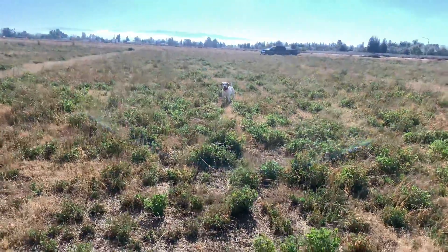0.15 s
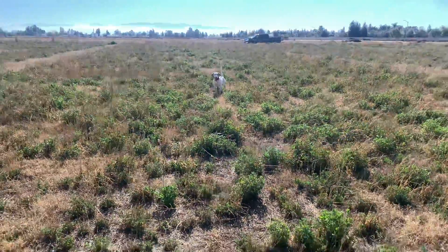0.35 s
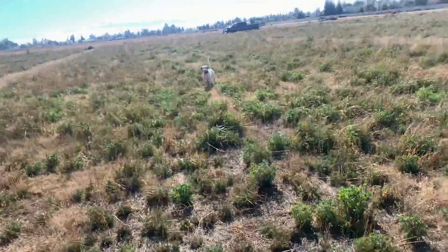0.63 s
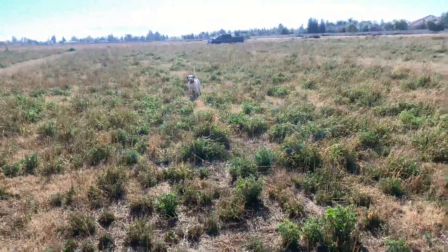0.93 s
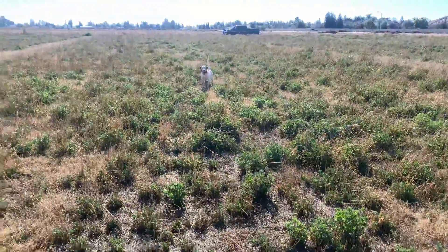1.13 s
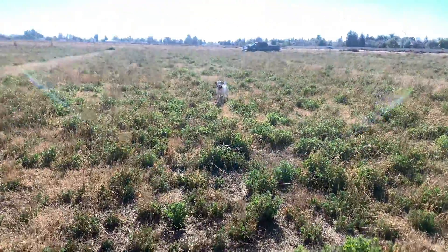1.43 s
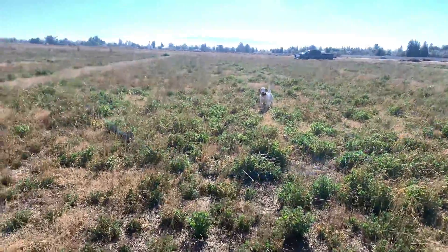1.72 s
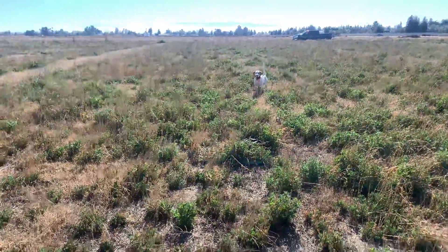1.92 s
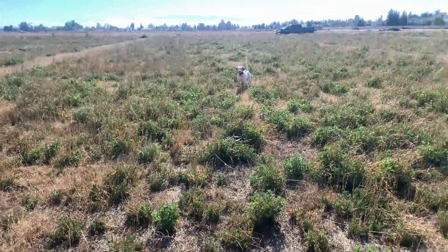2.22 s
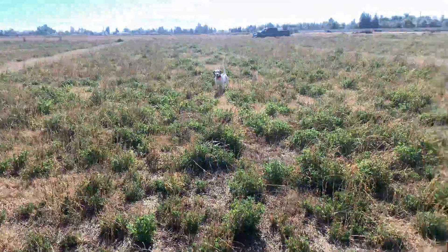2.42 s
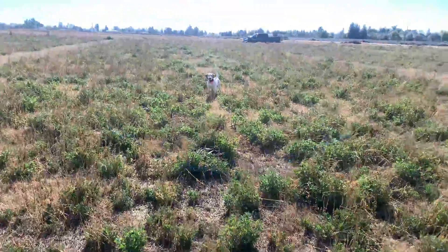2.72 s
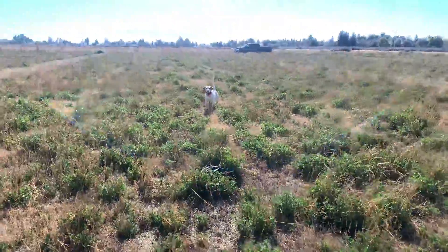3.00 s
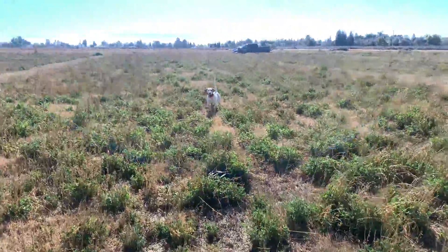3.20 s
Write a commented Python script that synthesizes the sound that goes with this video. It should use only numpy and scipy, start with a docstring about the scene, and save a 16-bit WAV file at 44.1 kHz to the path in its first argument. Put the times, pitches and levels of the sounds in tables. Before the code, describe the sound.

Crunchy footfalls on dry weeds, with snapping stems, leg swishes and faint low wind outdoors

```python
"""Footfalls crunch through dry grass and weeds in an open field, and legs brush the blades between them.
Each contact layers fizzing blades, crackling stalks and grinding earth, all made of tiny random clicks.
Stems snap as noise bursts, twigs click as brief rings, tufts crunch as grains in a sinking resonance,
and dull knocks fall in pitch. Filtered noise makes the wind rumble on two microphone ports and the field hush."""
import sys
import numpy as np
from scipy import signal
from scipy.fft import rfft, irfft, next_fast_len
from scipy.io import wavfile
from scipy.ndimage import uniform_filter1d, map_coordinates

SR = 44100
rng = np.random.default_rng(int(sys.argv[2]) if len(sys.argv) > 2 else 0)


def to_wav(sig):
    """Store sig (one row per channel, or 1-D mono) as 16-bit WAV at the path in sys.argv[1].

    Samples outside -1..1 are clipped; the rate is SR.
    """
    pcm = np.clip(np.atleast_2d(sig), -1, 1) * 32767
    pcm = np.round(pcm).astype(np.int16)
    wavfile.write(sys.argv[1], SR, pcm.T)  # frames by channels


N = 147735  # length in samples

# Bright colour of grass blades and snapping stems. Each row: frequency in Hz, relative density in dB per Hz.
BLADE_COLOUR = [(500, -54), (2000, -17), (4000, -3), (5400, -11.5), (7000, -1), (8800, -1), (11500, -3.5),
                (15800, -5)]


def amp(db):
    """Decibels to gain."""
    return 10 ** (np.asarray(db) / 20)


def unit(x):
    """Scales to rms 1."""
    return x / np.sqrt(np.mean(x ** 2) + 1e-20)


def read(points, hz):
    """Reads a table on a log-frequency axis."""
    f, value = np.transpose(points)
    return np.interp(np.log(hz + 1), np.log(f + 1), value)


def add(mix, s, sound):
    """Adds a stereo sound at time s, trimmed to fit the mix."""
    at = round(s * SR)
    sound = sound[:, max(-at, 0):]
    part = mix[:, max(at, 0):][:, :sound.shape[1]]
    part += sound[:, :part.shape[1]]


def ports(pair, spectrum=None, side=0):
    """Colours a sound and gives it to both ports; the second row is the part that they do not share."""
    # Level between the ports. Each row: frequency in Hz, left minus right in dB.
    port_balance = [(250, 1), (700, -3.5), (1500, 1), (3200, 4.5), (4600, 0), (6100, -6), (7400, 0),
                    (16000, -0.5)]
    # Phase between the ports. Each row: frequency in Hz, lead of the left in radians.
    port_phase = [(1300, .5), (3300, 0.4), (5000, 1.34), (6700, -1.76), (8700, -3), (10600, -6.5),
                  (11500, -7), (13500, -9.5), (15800, -12)]
    # Likeness of the ports. Each row: frequency in Hz, likeness from 0 to 1.
    port_likeness = [(300, 1), (2200, 0.63), (3400, 0.37), (7300, 1), (8600, 1), (11000, 0.56),
                     (13500, .98), (15700, 0.68)]
    mono_hz = 302  # well below this both ports hear the same
    side_from_hz, side_turn_hz = 650, 8340  # side +1 or -1 shifts the phase by one turn between these

    n = next_fast_len(pair.shape[1])
    hz = np.fft.rfftfreq(n, 1 / SR)
    a, b = rfft(pair, n)
    wide = hz ** 2 / (hz ** 2 + mono_hz ** 2)
    like = 1 - wide * (1 - np.clip(read(port_likeness, hz), 0, 1))
    shared = a * np.sqrt((1 + like) / 2)
    apart = b * np.sqrt((1 - like) / 2)

    side_turns = side * np.clip((hz - side_from_hz) / (side_turn_hz - side_from_hz), 0, 1)
    lead = wide * read(port_phase, hz) - 2 * np.pi * side_turns
    tilt = amp(wide * read(port_balance, hz))
    left = (shared + apart) * tilt
    right = (shared - apart) * np.exp(-1j * lead)
    both = np.array([left, right]) * np.sqrt(2 / (1 + tilt ** 2))  # the tilt keeps the total power
    if spectrum is not None:
        both = both * amp(read(spectrum, hz))
    return irfft(both, n)[:, :pair.shape[1]]


def point(sound, spectrum=None):
    """One short sound at the ports, with peak 1."""
    heard = ports(np.array([sound, np.zeros_like(sound)]), spectrum)
    return heard / abs(heard).max()


def clumps(n, length):
    """Slow chance that wanders over about the given time in seconds, with rms 1."""
    slow = np.cumsum(rng.standard_normal(n))
    centred = slow - uniform_filter1d(slow, int(2 * length * SR))
    return unit(uniform_filter1d(centred, int(length * SR / 4)))


def air():
    """Wind that rises and falls by a level table, rumbling on the ports, over the noise hush of the field."""
    # Wind on the ports. Each row: time in seconds, level in dB before trim.
    wind = [(0.0, -37.5), (0.3, -37), (0.44, -37.5), (0.492, -29), (0.562, -42), (1.5, -50), (1.73, -46),
            (1.862, -43), (2.63, -48.5), (2.67, -39.5), (3.01, -50), (3.09, -35), (3.14, -47)]
    # Colours of wind and field. Each row: frequency in Hz, relative density in dB per Hz.
    rumble_colour = [(15, -36), (30, -13), (48, -0.5), (68, 4), (140, -7), (320, -26.5), (600, -38),
                     (2000, -97)]
    field_colour = [(100, -31), (400, 0), (900, -1.5), (1800, 2.5), (2800, -6.5), (16000, -15.5)]
    wind_trim_db, field_db = -1.5, -64.5
    waver_s, waver_db = 0.049, -0.07  # a very slight random waver

    wind_db = wind_trim_db + np.interp(np.arange(N) / SR, *np.transpose(wind))
    level = amp(wind_db + waver_db * clumps(N, waver_s))
    rumble = level * unit(ports(rng.standard_normal((2, N)), rumble_colour))
    hush = amp(field_db) * unit(ports(rng.standard_normal((2, N)), field_colour))
    return rumble + hush


def knock(s, db, hz, halve, swell):
    """A soft, ragged pop whose pitch drops as it swells and dies."""
    rough, bumps_per_cycle = 0.69, 2.72  # irregular share and its detail
    t = np.arange(SR // 6) / SR
    turns = hz * halve * np.log(1 + t / halve)  # cycles so far; the pitch is half at t = halve
    ragged = map_coordinates(rng.standard_normal(size=256), [bumps_per_cycle * turns], mode="mirror")
    x = t / swell
    level = x / (1 + x ** 2) * np.exp(-(x / 2.0) ** 2)
    return s, amp(db) * point((np.sin(2 * np.pi * turns) + rough * ragged) * level)


def tuft(s, length, db, hz):
    """A bunch of stalks gives way: coarse grains ring in a broad resonance that sinks as it flattens."""
    width, sag = 0.52, 0.57  # damping and pitch drop as shares of the first pitch
    grains_per_s = 5000
    t = np.arange(int(2 * length * SR)) / SR
    u = np.minimum(t / length, 1)
    struck = rng.random((2, len(t))) < grains_per_s / SR
    grains = rng.standard_normal((2, len(t))) * struck

    # shift the sinking pitch down to zero, resonate there, and shift back up
    turn = np.exp(2j * np.pi * np.cumsum(hz * (1 - sag * u)) / SR)
    r = np.exp(-2 * np.pi * width * hz / SR)
    ring = (turn * signal.lfilter([1], [1, -2 * r, r * r], grains / turn)).real
    swell = np.sqrt(abs(np.sin(np.pi * np.sqrt(u))))
    return s, amp(db) * unit(ports(ring * swell)) / np.sqrt(2)  # half of the span is silent


def twig(s, db, hz):
    """A woody click: a brief noise crack and a ring that dies within a few cycles."""
    # Colour of the crack. Each row: frequency in Hz, relative density in dB per Hz.
    crack_colour = [(300, -16), (2800, 0), (4300, 2), (5500, -8)]
    crack_s, crack_share, crack_hz = 0.001, 0.25, 2040  # decay; share of the ring's peak at this pitch
    rough, decay_cycles = 0.18, 0.75

    t = np.arange(-256, 1792) / SR
    turns = np.maximum(t, 0) * hz
    tone = np.sin(2 * np.pi * turns) + rough * rng.standard_normal(len(t))
    ring = tone * np.sqrt(turns) * np.exp(-turns / decay_cycles)
    crack = rng.standard_normal(len(t)) * (t >= 0) * np.exp(-abs(t) / crack_s)
    share = crack_share * hz / crack_hz  # thinner twigs crack harder
    return s + t[0], amp(db) * (point(ring) + share * point(crack, crack_colour))


def snap(s, db):
    """A stem breaks with a bright burst of noise that decays in a fraction of a millisecond."""
    decay_s = 0.00035
    t = np.arange(-256, 768) / SR
    burst = rng.standard_normal(len(t)) * (t >= 0) * np.exp(-abs(t) / decay_s)
    return s + t[0], amp(db) * point(burst, BLADE_COLOUR)


def crackle(n, per_s, spread_db, count=7):
    """Tiny fractures of random size, each in one of several overlapping pitch ranges."""
    octave = np.log2(np.fft.rfftfreq(n, 1 / SR) + 1)
    shape = (2, count, n)
    size = amp(spread_db * np.minimum(rng.exponential(1, shape), 4)) * rng.choice([-1, 1], shape)
    clicks = size * (rng.random(shape) < per_s / count / SR)
    centres = np.linspace(np.log2(400), np.log2(13000), count)[:, None]
    bands = 1 / (1 + (octave - centres) ** 4)
    bands = bands / np.linalg.norm(bands, axis=0)  # the ranges add up to even power
    return irfft((rfft(clicks) * bands).sum(1), n)


def pops(n):
    """Sparse clicks of thicker stems, random in time, size and sign."""
    per_s, spread_db = 230, 1.5
    size = amp(spread_db * np.minimum(rng.exponential(1, (2, n)), 2))
    return size * rng.choice([-1, 1], (2, n)) * (rng.random((2, n)) < per_s / SR)


def contact(s, rise, hold, fall, earth_db, stalks_db, blades_db, side, per_s, spread_db, gritty_db, clump_db):
    """Pressure builds, holds and eases: blades fizz, stalks crackle and tick, and the earth grinds."""
    # Colours of the layers. Each row: frequency in Hz, relative density in dB per Hz.
    earth_colour = [(40, -48), (120, 1), (250, 2.5), (500, 2.5), (950, 0), (1500, -3.5), (2500, -5.5),
                    (6000, -88)]
    stalk_colour = [(200, 2.5), (600, -5.5), (1200, 1.5), (2200, 4), (4000, 0), (5200, -5), (8000, -7.5),
                    (16000, -17)]
    tick_colour = [(250, -24), (600, -4), (1000, 6.5), (1900, 4), (3800, 5), (5500, -18), (16000, -18)]
    rise_db, earth_lag_s, earth_fall = 28.5, 0.011, 2.6  # the earth follows late and eases this much faster
    clump_s, flutter_s, flutter_db = 0.045, 0.012, 1.8
    ticks_db = -7.5  # relative to the stalks

    n = next_fast_len(int((2 * rise + hold + 45 / fall) * SR))
    t = np.arange(n) / SR - 2 * rise  # full weight at zero

    def press(t, fall):
        """Gain of the pressure: straight lines in dB up to full weight and down after the hold."""
        return amp(rise_db * np.minimum(t, 0) / rise - fall * np.maximum(t - hold, 0))

    def layer(clicks, colour):
        """Places one layer at the ports with rms 1."""
        return unit(ports(clicks, colour, side))

    uneven = clump_db * clumps(n, clump_s)  # tufts give way unevenly
    flutter = flutter_db * clumps(n, flutter_s)  # stems catch and slip
    blades = amp(blades_db + 0.45 * (uneven + flutter)) * layer(crackle(n, 2 * per_s, spread_db), BLADE_COLOUR)
    stalks = amp(stalks_db + uneven + flutter) * layer(crackle(n, per_s, spread_db), stalk_colour)
    ticks = amp(stalks_db + ticks_db) * layer(pops(n), tick_colour)
    earth = amp(earth_db + uneven) * layer(crackle(n, per_s / 2, gritty_db), earth_colour)
    grass = (blades + stalks + ticks) * press(t, fall)
    ground = earth * press(t - earth_lag_s, earth_fall * fall)
    return s - 2 * rise, grass + ground


def swish(*row):
    """A leg brushes through the grass: fractures of widely spread size under light pressure."""
    return contact(*row, per_s=14000, spread_db=5.0, gritty_db=4.5, clump_db=0.78)


def footfall(*row):
    """A foot crushes stalks against the earth: fractures of more even size that give way in clumps."""
    return contact(*row, per_s=14000, spread_db=2.0, gritty_db=5, clump_db=1.13)


def scene():
    """The walk through the field, from the wind up to the footfalls."""
    # Dull knocks and thuds. Each row: start in seconds, peak in dB, first pitch in Hz,
    # time to half the pitch in seconds, swell in seconds.
    knocks = [(0.126, -36.5, 560, 0.0077, 0.0066), (0.2834, -23.5, 720, 0.00537, 0.0056),
              (0.291, -16.5, 228, 0.012, 0.0086), (0.311, -21, 132, 0.012, 0.0044),
              (0.469, -27, 174, 0.02, 0.0083), (1.075, -38, 225, 0.017, 0.0071),
              (1.806, -28, 247, 0.044, 0.0081), (2.307, -21.5, 1462, 0.0017, 0.0027)]
    # Single tufts crunching or scraping. Each row: start in seconds, length in seconds,
    # level in dB, first pitch in Hz.
    tufts = [(0.449, 0.015, -38, 580), (0.464, 0.027, -42.5, 825), (1.228, 0.024, -52, 1910),
             (1.757, 0.015, -42, 1940), (1.784, .018, -29.5, 1030), (1.802, 0.0097, -34, 1930),
             (1.805, 0.025, -37.5, 394), (1.843, 0.0037, -41, 2240), (2.763, 0.02, -52, 1490),
             (3.067, 0.011, -35, 720), (3.086, 0.0067, -31.5, 850)]
    # Twigs and clods clicking underfoot. Each row: start in seconds, peak of the ring in dB, pitch in Hz.
    twigs = [(0.083, -40, 1350), (.204, -37.5, 1460), (.2235, -36.5, 1060), (.667, -38.5, 2300),
             (1.1653, -59, 1920), (1.1763, -33, 3670), (1.2588, -34, 1300), (1.451, -31, 1940),
             (1.463, -27.5, 2930), (1.4673, -27.5, 1470), (1.494, -28, 1400), (1.530, -33.5, 890),
             (1.536, -38, 980), (1.542, -30, 940), (1.552, -32, 1443), (2.027, -44.5, 960),
             (2.3064, -24, 1150), (2.3714, -31.5, 1910), (2.830, -33, 1030), (2.8619, -38, 1330),
             (3.021, -33, 1410), (3.131, -22.5, 805), (3.164, -33.5, 950)]
    # Dry stems snapping. Each row: start in seconds, peak in dB.
    snaps = [(0.0662, -37), (0.707, -34), (1.673, -39.5), (1.77, -21), (2.26, -25), (2.2710, -10.5),
             (2.4185, -21.5), (3.0673, -17.5)]
    # Legs brushing the grass, then footfalls. Each row: time of full weight in seconds, rise in seconds,
    # hold in seconds, fall in dB per second, earth, stalks and blades in dB before the pressure and
    # unevenness act, side as -1, 0 or 1.
    swishes = [(.08, 0.17, 0.17, 70.37, -55.5, -63, -72, 0),
               (0.336, 0.16, 0.046, 110.6, -58.5, -66, -49, 0),
               (0.559, 0.045, 0.017, 247.3, -54.5, -60, -83, 0),
               (0.708, 0.11, 0.11, 97.35, -69, -56.5, -54, 0),
               (1.177, .13, 0.1, 69.95, -70, -52.5, -49.5, 1),
               (1.262, 0.18, 0.21, 120.5, -59, -52.5, -55, 1),
               (1.454, 0.03, 0.032, 200.5, -52.5, -55, -48.5, 1),
               (2.164, .02, 0.037, 118.6, -59, -62, -67, 0), (2.331, .10, .085, 196.6, -55, -48, -49, 0),
               (2.458, 0.078, 0.068, 50.72, -59, -58.5, -59, 0),
               (2.744, .09, .1, 75, -53, -53.5, -57.5, -1),
               (3.016, 0.0099, 0.046, 150.9, -47.5, -50, -53.5, 1)]
    steps = [(0.449, 0.029, 0.0077, 175.4, -35.5, -38.5, -32.5, 0),
             (1.779, .055, 0.055, 260.8, -40.5, -37, -34.5, 0),
             (2.254, .05, 0.0308, 100.9, -47, -44.5, -40, 0),
             (3.064, 0.012, 0.046, 150.4, -37, -36.5, -36.5, 1)]

    mix = air()
    layers = [(knock, knocks), (tuft, tufts), (twig, twigs), (snap, snaps), (swish, swishes), (footfall, steps)]
    for source, table in layers:
        for row in table:
            add(mix, *source(*row))
    return mix


def record(dry):
    """The recorder's band limit: a steep low-pass filter."""
    edge_hz = 15900
    lowpass = signal.firwin(511, edge_hz, window=("kaiser", 9), fs=SR)
    return signal.oaconvolve(dry, lowpass[None], "same")


dry = scene()
out = record(dry)
to_wav(out)
```